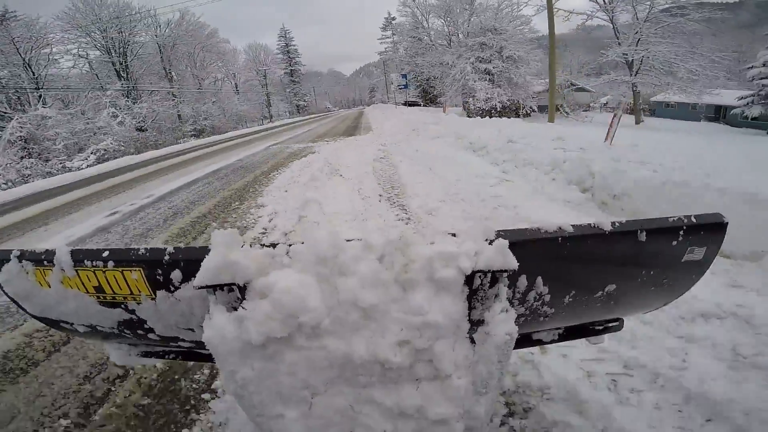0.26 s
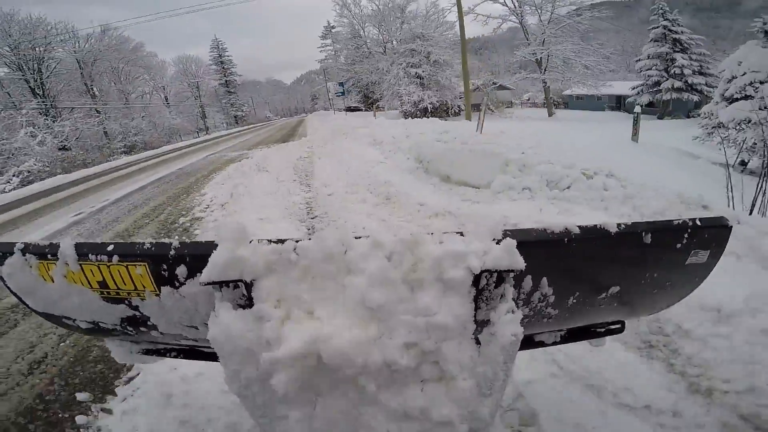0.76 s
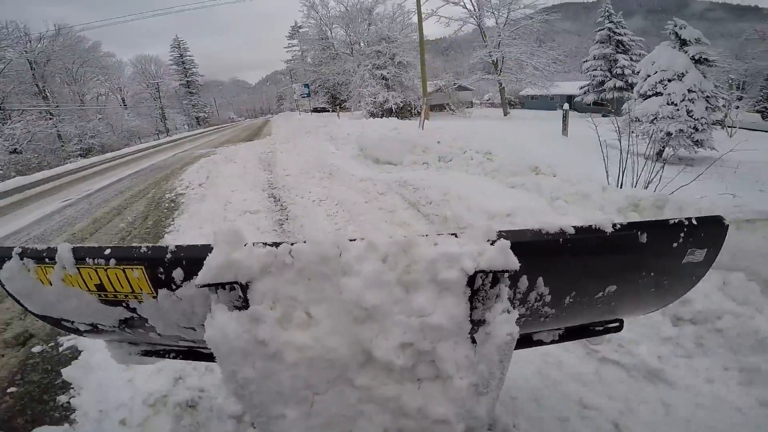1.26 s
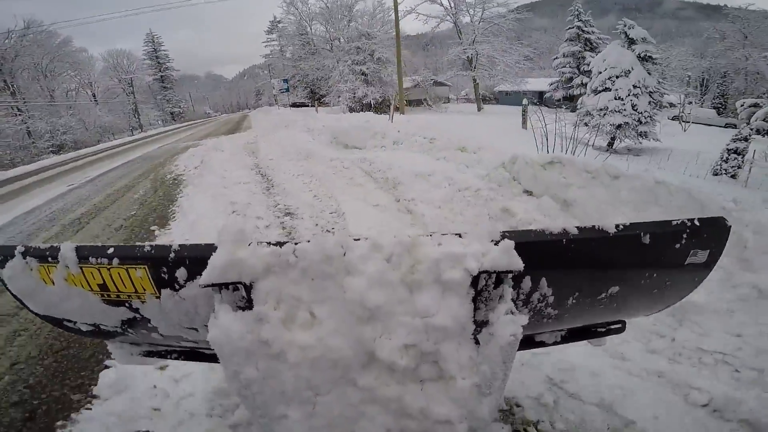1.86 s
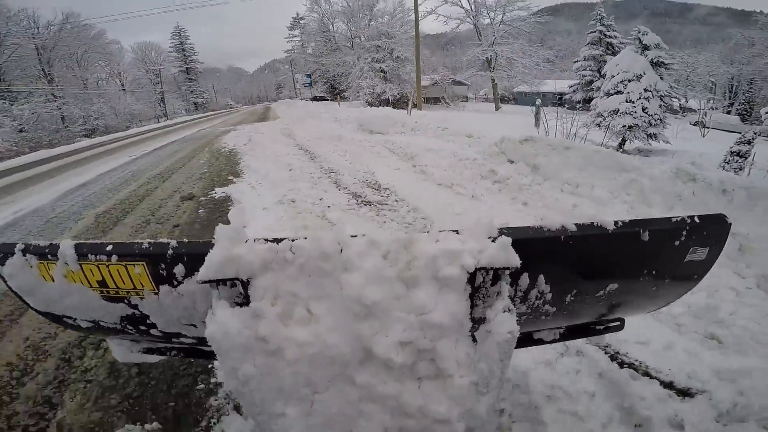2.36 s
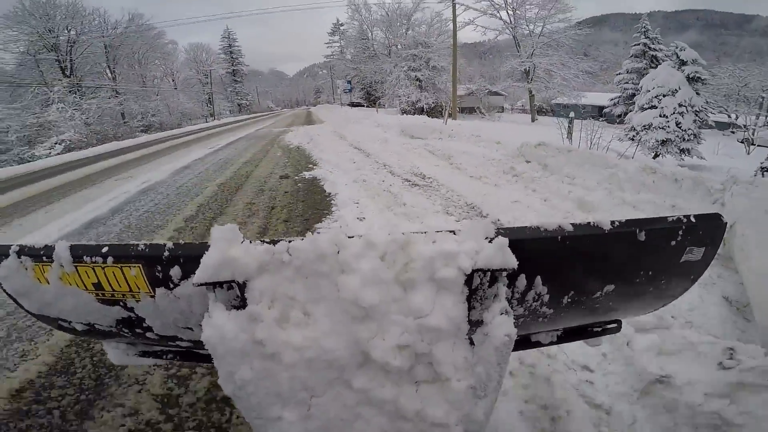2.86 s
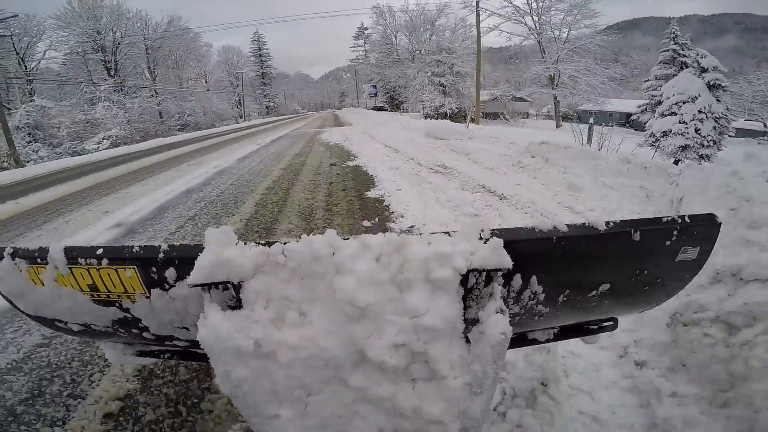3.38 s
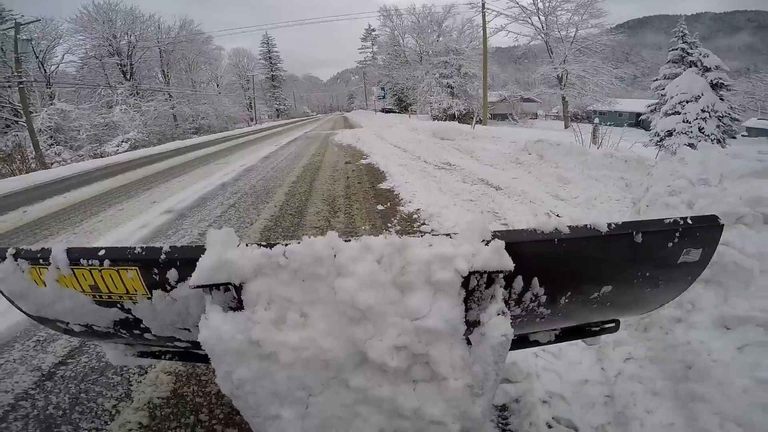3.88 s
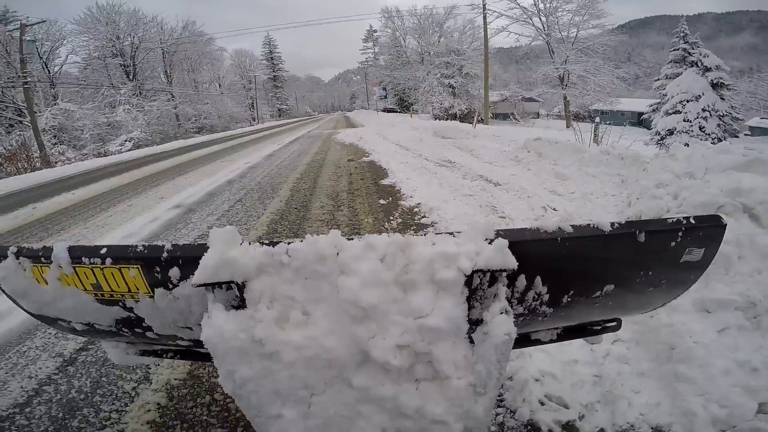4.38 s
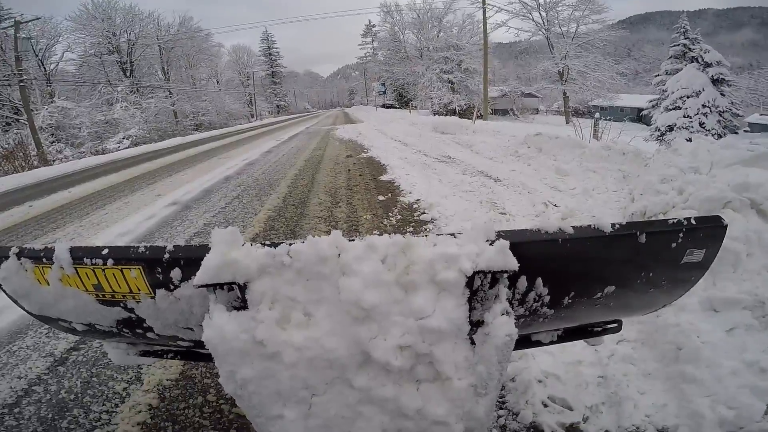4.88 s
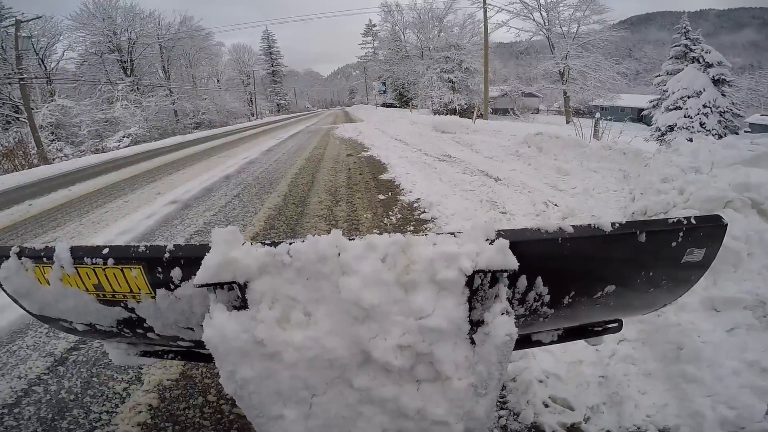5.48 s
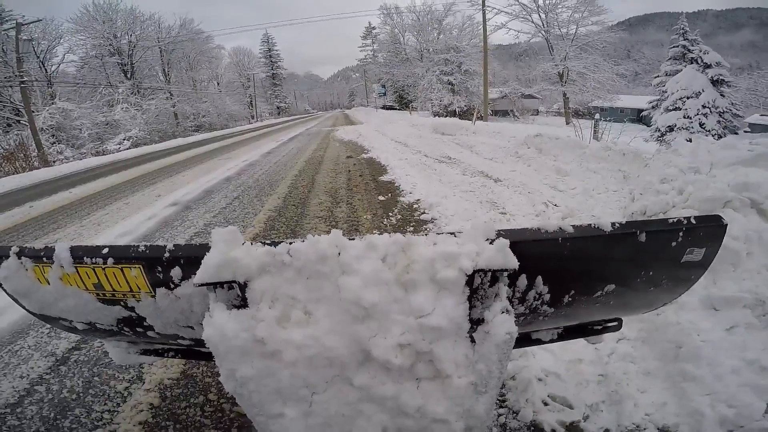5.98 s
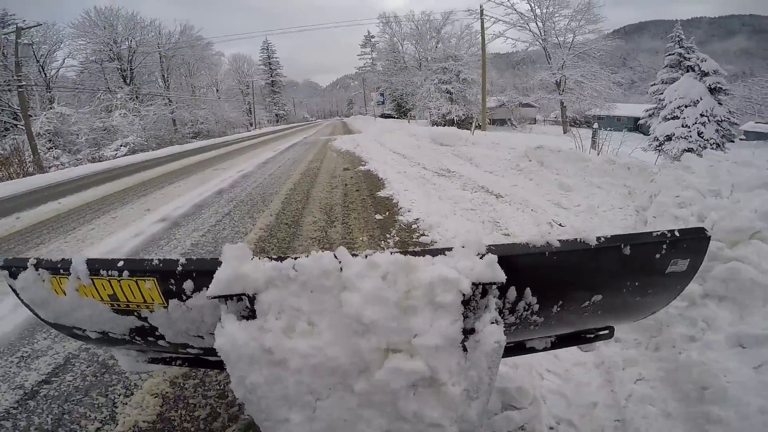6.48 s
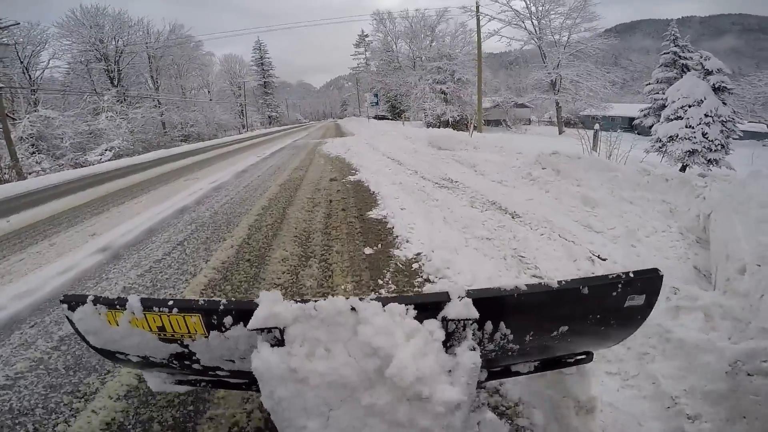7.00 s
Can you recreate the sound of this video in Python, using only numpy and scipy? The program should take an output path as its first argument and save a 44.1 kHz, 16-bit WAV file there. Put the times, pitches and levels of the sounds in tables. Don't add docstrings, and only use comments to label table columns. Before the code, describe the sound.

A microphone clamped on a quad bike, within arm's reach of its single-cylinder engine, in open snowy air. From 0 to 0.5 s the engine revs with deep throbbing hum, boomy blade panel and buzzing loose steel. The gain then drops, leaving thinner rattle and soft hiss; a brief loud opening with a small pop comes around 1.0 s, another swell at 1.5-1.7 s with tiny creaks. Revs rise again around 1.9-2.4 s, then fall; clustered metal knocks at 2.8 s lead to a big sharp pop at 2.87 s. From 3.3 s the full hum returns, slowing to a lumpy idle by 3.8 s. Heavy knocks thud at 4.5-4.6 s, with lighter ones and ticks later. About 5.8-6.4 s revs climb, plastic creaks, and the hum drops away. Hard clacks at 6.4 and 6.57 s accompany a gritty winch grind, with a thin sliding squeal, loading harder until 7.2 s.

```python
import sys
import numpy as np
from scipy import signal
from scipy.fft import rfft, irfft
from scipy.io import wavfile
from scipy.ndimage import uniform_filter1d

SR = 44100
rng = np.random.default_rng(int(sys.argv[2]) if len(sys.argv) > 2 else 0)


def unload_wav(signal):
    wavfile.write(
        sys.argv[1],
        SR,
        np.round(np.clip(np.atleast_2d(signal).T, -1, 1) * 32767).astype(np.int16),
    )


def to_linear_factor(level_db):
    exponent = np.asarray(level_db, float) / 20
    return 10 ** exponent


N = 319284


def evened(x):
    return x / np.sqrt(np.mean(x ** 2) + 1e-20)


def curve(rows, axis=1):
    rows = np.array(rows)
    return np.interp(np.arange(N) / SR, rows[:, 0], rows[:, axis])


def read(points, hz):
    f, value = np.transpose(points)
    return np.interp(np.log(hz + 1), np.log(f + 1), value)


def add(mix, s, sound):
    part = mix[round(s * SR):][:len(sound)]
    part += sound[:len(part)]


def coloured(x, points):
    return evened(irfft(rfft(x) * to_linear_factor(read(points, np.fft.rfftfreq(N, 1 / SR))), N))


def resonate(x, modes, count=1):
    out = 0
    for k, (hz, width, db) in enumerate(modes):
        ring = x
        for _ in range(count):
            ring = signal.lfilter(*signal.iirpeak(hz, hz / width, SR), ring)
        out = out + (-1) ** k * to_linear_factor(db) * evened(ring)
    return evened(out)


def drift(per_s):
    size = int(SR / per_s)
    return evened(uniform_filter1d(uniform_filter1d(rng.standard_normal(N), size), size))


def bumps(rows):
    t = np.arange(0, N + 64, 64) / SR
    total = 0
    for s, half, db in rows:
        total = total + db * np.cos(np.pi / 2 * np.clip((t - s) / half, -1, 1)) ** 2
    return np.interp(np.arange(N) / SR, t, total)


# (time [s], firing rate [1/s])
SPEED = [(0, 23.7), (.27, 24.3), (.55, 20.1), (.91, 19.3), (1.03, 20.8), (1.48, 18.4), (1.91, 24.6),
         (2.3, 25.4), (2.68, 19.3), (2.96, 22.6), (3.38, 16.8), (3.78, 14.25), (4.7, 14.5), (5.76, 14.2),
         (6, 18.9), (6.45, 24), (7, 23.5), (7.24, 24.1)]


def engine_speed():
    rate = uniform_filter1d(curve(SPEED), size=3000)
    turns = np.cumsum(rate * (1 + .005 * drift(10))) / SR + .7
    return rate, turns


# (start [s], end [s], hum [dB], rattle trim [dB], hiss as the wind filter comes in [dB])
OPEN = [
    (0, 0.505, -12, 0.5, -67),
    (0.983, 1.034, -7.5, -2, -65),
    (1.495, 1.698, -9, -0.5, -66),
    (2.776, 2.876, -8.5, 1.1, -64.5),
    (3.297, 6.18, -12, 0.85, -65),
]
# (time [s], half width [s], level [dB])
SURGES = [(.5, 0.16, -4.5), (.53, 0.051, 5), (.7, 0.32, -3), (2.28, 0.093, 4), (1.85, 0.18, -0.5),
          (2.5, 0.11, 1), (2.66, 0.096, 4.5), (2.92, 0.11, 5.5), (3.83, 0.074, 5), (4.61, 0.024, 6),
          (4.75, 0.18, -2.5), (5.15, 0.02, 5.5), (5.86, 0.2, 3), (6.3, 0.069, -3.5)]
HISS_OPEN_DB = -71


def levels(rate):
    t = np.arange(N) / SR
    hum_db, hiss_db = np.zeros((2, N))
    rattle_db = -56 + 2 * np.maximum(rate - 19.5, 0)
    for start, end, open_db, trim_db, left_db in OPEN:
        is_open = (t >= start) & (t <= end)
        creep_db = left_db + 4.5 * (t - end)
        hiss_db = np.where(t > end, creep_db, np.where(t >= start, HISS_OPEN_DB, hiss_db))
        hum_db = np.where(t > end, creep_db + 49, np.where(t >= start, open_db, hum_db))
        open_rattle_db = -45.5 + trim_db + .89 * (rate - 14.4)
        rattle_db = np.where(is_open, open_rattle_db, rattle_db)
    shake_db = (curve(WINCH) + 99) * (t > WINCH[0][0]) - 99 - 7
    rattle_db = np.maximum(rattle_db, shake_db)
    switch_s = .03
    hum_db, rattle_db, hiss_db = uniform_filter1d([hum_db, rattle_db, hiss_db], int(switch_s * SR), axis=1)
    return hum_db, rattle_db + bumps(SURGES), hiss_db


# (multiple of the firing rate, level [dB])
ORDER_DB = [(1, -4), (2, 0), (3, 0), (4, 4), (5, -2), (6, -8)]
# (frequency [Hz], level [dB])
MOUNT = [(14, -55), (29, -26), (38, -4), (43, 0), (49, -2), (57, -18), (64, -27), (72, -27), (96, -24),
         (110, -37), (150, -46)]
# (time [s], half width [s], level [dB])
SAGS = [(.47, 0.089, 2), (.57, 0.068, -1), (.92, 0.095, -9.5), (.965, 0.01, -2), (1.385, 0.11, -10),
        (1.46, 0.046, -6.5), (1.565, 0.013, -15), (1.97, 0.21, -5.5), (2.5, 0.15, 2), (2.797, 0.024, -16),
        (2.9, 0.021, -5), (3.03, 0.11, -6.5), (3.28, 0.11, -5.5), (3.385, 0.015, -11),
        (3.517, 0.032, -10.5), (3.59, 0.014, 6.5), (3.695, 0.033, -14), (3.85, 0.081, 3.5), (4.11, .05, -4),
        (4.33, 0.019, -5), (5.73, 0.02, -3.5), (5.917, 0.022, -13), (5.967, 0.027, -11), (6.13, 0.11, 4),
        (6.35, 0.18, -8.5), (6.54, 0.11, -6.5), (7.1, 0.18, -2.5), (7.24, 0.015, -25)]


def hum(rate, turns, hum_db, rattle_db):
    frame_db = 0.38 * (uniform_filter1d(rattle_db, size=3000) + 42.5)
    tones, power = 0, 0
    for k, db in ORDER_DB:
        by_frame = np.clip(k * rate / 10 - 5, 0, 1)
        gain = to_linear_factor(db + read(MOUNT, k * rate) + 1.4 * drift(5.1) + frame_db * by_frame)
        tones = tones + gain * np.cos(2 * np.pi * (k * turns + rng.random()))
        power = power + gain ** 2 / 2
    return to_linear_factor(hum_db + bumps(SAGS)) * tones / np.sqrt(power)


# (frequency [Hz], width [Hz], level [dB])
PANEL = [(168.8, 32.5, -2), (211.6, 58, -0.5), (258.2, 85, -9)]
# (time [s], half width [s], level [dB])
JOGS = [(.65, 0.05, 8), (1.3, 0.078, 5), (1.53, 0.041, -1), (2.36, 0.068, 8), (2.7, 0.053, 6.5),
        (2.81, 0.033, 1), (3.56, 0.054, 6.5), (3.84, .05, -5), (4.08, 0.14, -4.5), (4.26, 0.028, -0.5),
        (4.45, 0.036, -15), (4.51, 0.057, 8), (4.6, 0.024, 14.5), (5.05, 0.037, 3.5), (5.18, 0.059, -9),
        (5.4, .04, -6), (5.5, 0.044, -7), (6.08, 0.063, 0.5), (6.57, .03, 11.5), (6.69, 0.089, 0),
        (6.82, 0.1, 6.5), (7.02, 0.09, 9), (7.2, 0.099, 8)]


def boom(rate, turns, rattle_db):
    firing = 0
    for k in range(6, 15):
        firing = firing + np.cos(2 * np.pi * (k * turns + rng.random())) * to_linear_factor(2.5 * drift(5))
    shudder = rng.standard_normal(N) * to_linear_factor(2.3 * drift(26))
    clean = np.clip((rate - 8) / 20, 0, .85)
    drive = clean * resonate(firing, PANEL) + np.sqrt(1 - clean ** 2) * .8 * resonate(shudder, PANEL)
    return to_linear_factor(rattle_db + 7.5 + bumps(JOGS)) * resonate(drive, PANEL)


def jolts(turns, decay, lag):
    u = ((turns - lag) % 1) / decay
    return np.e * u * np.exp(-u)


# (frequency [Hz], width [Hz], level [dB])
RATTLE = [(531.6, 68, 4.5), (1020, 95, 7), (1220, 91, 9), (1302, 170, 1.5), (1762, 60, -1), (2268, 150, 3),
          (2690, 41, -15.5)]
# (frequency [Hz], level [dB])
RATTLE_BED = [(40, -10.5), (70, 2), (130, 8), (280, -3), (400, -13), (750, -9), (920, -15.5), (1500, -8),
              (2500, -11.5), (3000, -21), (3600, -29.5), (4300, -50), (6000, -67)]


def rattle(rate, turns, rattle_db):
    blows = jolts(2 * turns, .2, .0) + .4 * jolts(turns, .09, .9)
    ring, buzz = rng.standard_normal((2, N)) * to_linear_factor(.8 * drift(60))
    steps = np.floor([turns + .04, 2 * turns - .2])
    upper, lower = np.gradient(steps, axis=1) * to_linear_factor(1.0 * drift(40))
    taps = 0.86 * resonate(upper, RATTLE[2:4], count=3) + resonate(lower, RATTLE[1:2], count=3)
    brackets = .6 * taps + .9 * resonate(ring * (.7 + blows), RATTLE, count=2)
    share = 1.88 * (rate / 18) ** 1.7
    frame = coloured(buzz * (1.5 + blows) * to_linear_factor(2.4 * drift(300)), RATTLE_BED)
    return to_linear_factor(rattle_db + 4.5) * (brackets + share * frame) / np.sqrt(0.97 + share ** 2)


# (frequency [Hz], level [dB])
HISS_COLOUR = [(300, 17), (1000, 8), (3000, 5), (5000, 3.5), (9000, -4), (12000, -5.5), (14500, -8),
               (15500, -17)]


def hiss(hiss_db):
    follow_db = .5 * np.maximum(bumps(SAGS), -6)
    hiss_db = hiss_db + follow_db * (hiss_db < HISS_OPEN_DB + 1)
    flutter_db = 2.2 * drift(150) * (hiss_db < HISS_OPEN_DB + 2)
    return to_linear_factor(hiss_db + 8 + flutter_db) * coloured(rng.standard_normal(N), HISS_COLOUR)


# (time [s], level [dB])
CREAKS = [
    (0.484, -58.5),
    (1.642, -54),
    (1.664, -59.5),
    (1.681, -53),
    (6.078, -60.5),
    (6.127, -54.5),
    (6.138, -54.5),
    (6.15, -58),
    (6.165, -58.5),
]


def creaks():
    out = np.zeros(N)
    for s, db in CREAKS:
        add(out, s, to_linear_factor(db) * np.diff(rng.standard_normal(301)) * np.hanning(300))
    return out


# (time [s], level [dB], ring [Hz], body [dB], low thud [dB])
KNOCKS = [(1.005, -32, 1100, -46, -45), (1.49, -40, 1010, -64, -24), (2.77, -34, 1010, -42, -23),
          (2.792, -33, 1230, -46, -25), (2.817, -25, 1250, -37, -39), (2.844, -22.5, 1610, -41, -28),
          (3.394, -30.5, 1070, -45, -28), (4.483, -26.5, 1020, -27, -17.5),
          (4.506, -26.5, 1220, -26, -13.5), (4.583, -24.5, 1070, -24, -17.5),
          (5.139, -36, 1020, -53, -40.5), (5.34, -39, 1260, -51, -27), (5.403, -48, 1190, -47, -32),
          (5.928, -32, 1030, -47, -30), (6.277, -36.5, 1240, -56, -34.5), (6.397, -13, 2470, -30.5, -62),
          (6.567, -12.5, 2280, -28, -23)]


def knocks():
    out, t = np.zeros(N), np.arange(6000) / SR
    for s, db, hz, body_db, thud_db in KNOCKS:
        burst = rng.standard_normal(len(t)) * to_linear_factor(-60 * t / .045) * np.minimum(t / .003, 1)
        ring = resonate(burst, [(hz, 0.17 * hz, 0), (2100, 1500, -5)], count=2)
        body = resonate(burst, [(483, 130, 14), (784, 37, -7.5)], count=2)
        thud = to_linear_factor(thud_db - 60 * t / .12) * np.sin(2 * np.pi * 195 * t) * np.minimum(t / 0.0039, 1)
        struck = to_linear_factor(db) * ring / abs(ring).max() + to_linear_factor(body_db - 2) * body / abs(body).max()
        add(out, s - .002, struck + thud)
    return signal.sosfilt(signal.butter(4, 3300, fs=SR, output="sos"), out)


# (time [s], level [dB])
POPS = [
    (1.039, -12),
    (2.874, 2),
]


def pops():
    out, t = np.zeros(N), np.arange(4000) / SR
    u = t / .00035
    swing = (1 - 1.6 * u) * np.exp(-.75 * u) * (1 - np.exp(-t / .00004))
    for s, db in POPS:
        add(out, s, to_linear_factor(db) * swing)
    return out


# (time [s], level [dB])
TICKS = [
    (1.587, -37),
    (3.8333, -28.5),
    (4.5124, -26.5),
    (4.5238, -34),
    (6.0441, -24.5),
    (6.0549, -32.5),
]
# (frequency [Hz], level [dB], t60 [s])
TICK_MODES = [(2700, 2, .05), (3600, -3, .012), (4600, -7, .003), (12000, -13, .003)]


def ticks():
    out, t = np.zeros(N), np.arange(4000) / SR
    bright = signal.butter(1, [1800, 7500], "band", fs=SR)
    modes = [(hz, 2.2 / t60, db) for hz, db, t60 in TICK_MODES]
    for s, db in TICKS:
        crack = rng.standard_normal(len(t)) * to_linear_factor(-60 * t / .014) * np.minimum(t / .0007, 1)
        rings = resonate(crack, modes)
        add(out, s, to_linear_factor(db - 7.0) * (signal.lfilter(*bright, crack) + 1.6 * rings / abs(rings).max()))
    return out


# (time [s], level [dB])
WINCH = [
    (6.37, -87),
    (6.386, -38),
    (6.5, -38),
    (6.62, -35),
    (6.85, -34.5),
    (7.0, -32),
    (7.13, -34),
    (7.24, -31.5),
]
# (frequency [Hz], width [Hz], level [dB])
WINCH_MODES = [(499, 83, -4.5), (706, 45, -4), (1296, 40, -6.5), (1448, 37, 1), (1737, 170, 0.5),
               (2188, 140, 7.5), (2570, 120, -5.5)]
# (frequency [Hz], level [dB])
WINCH_BED = [(300, -15.5), (700, -15.5), (920, -8), (1300, -1.5), (2300, -0.5), (2900, -7), (3500, -16.5),
             (5000, -27), (7000, -49), (12000, -62)]
# (frequency [Hz], width [Hz], level [dB])
WINCH_WHINE = [(4290, 80, 0), (4580, 120, -6), (4950, 100, -2), (5600, 160, -3), (6370, 130, -8)]
# (time [s], frequency [Hz], level against the grind [dB])
SQUEAL = [
    (6.38, 3150, -24),
    (6.52, 3260, -14),
    (6.65, 3270, -15),
    (6.83, 3290, -23),
    (6.88, 3260, -12),
    (7.1, 3200, -13),
    (7.24, 3170, -15),
]


def winch():
    drive = rng.standard_normal(N) * to_linear_factor(1.5 * drift(150) + .8 * drift(25))
    grind = 0.74 * coloured(drive, WINCH_BED) + 0.97 * resonate(drive, WINCH_MODES, count=2)
    whine = resonate(drive, [(hz, 1.7 * width, db) for hz, width, db in WINCH_WHINE], count=2)
    phase = 2 * np.pi * np.cumsum(curve(SQUEAL) + 22 * drift(120)) / SR
    squeal = to_linear_factor(curve(SQUEAL, axis=2) + 1.5 + 1.5 * drift(30)) * np.sin(phase)
    sound = evened(grind) + .045 * whine + squeal
    return to_linear_factor(curve(WINCH)) * sound * (np.arange(N) > WINCH[0][0] * SR)


def scene():
    rate, turns = engine_speed()
    hum_db, rattle_db, hiss_db = levels(rate)
    engine = hum(rate, turns, hum_db, rattle_db)
    engine = engine + boom(rate, turns, rattle_db) + rattle(rate, turns, rattle_db)
    housing = creaks() + pops() + ticks()
    return (engine + hiss(hiss_db) + housing + knocks() + winch())[None]


def band_limit(x):
    return signal.sosfilt(signal.butter(12, 15400, fs=SR, output="sos"), x)


def record(dry):
    over = np.maximum(abs(dry) - .65, 0)
    bent = dry - np.sign(dry) * (over - .22 * np.tanh(over / .22))
    return band_limit(bent)


dry = scene()
out = record(dry)
unload_wav(out)
```